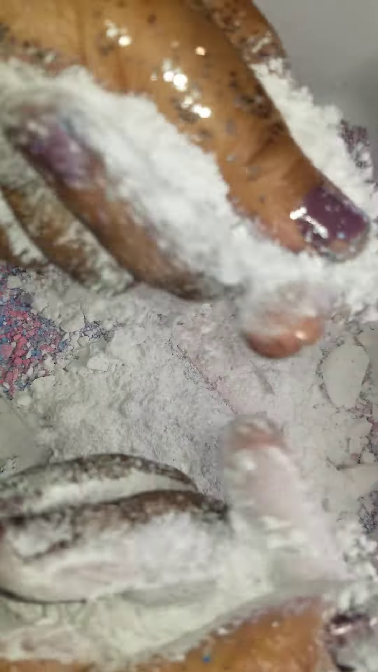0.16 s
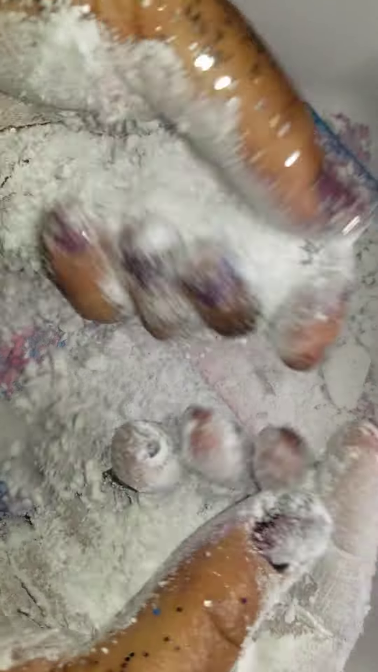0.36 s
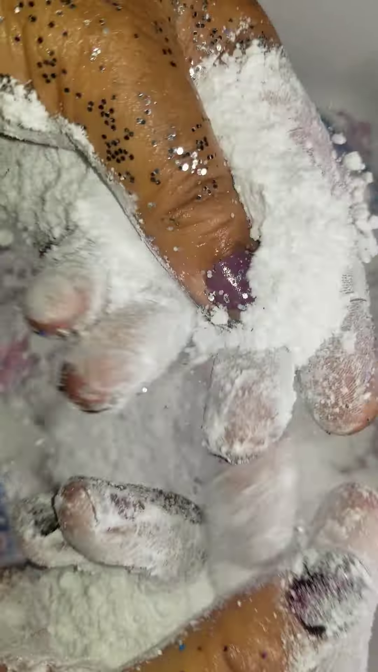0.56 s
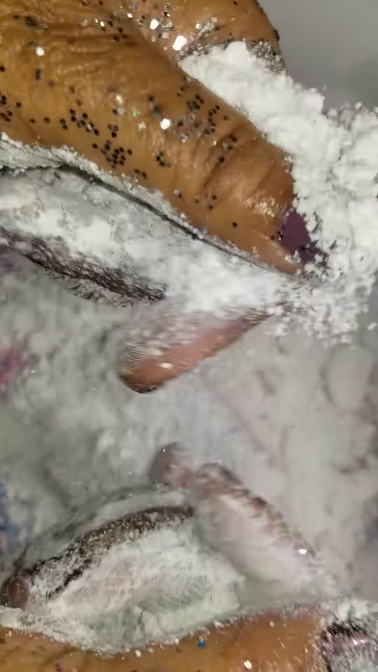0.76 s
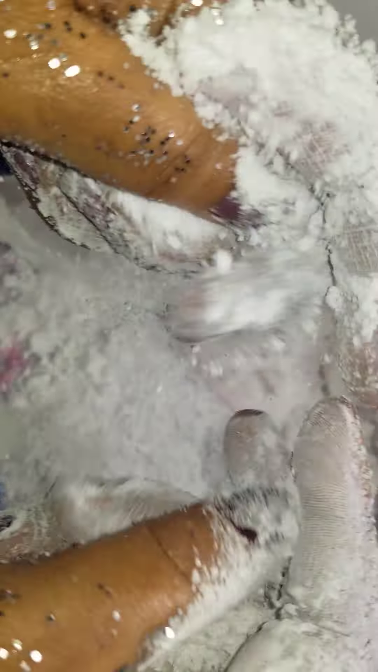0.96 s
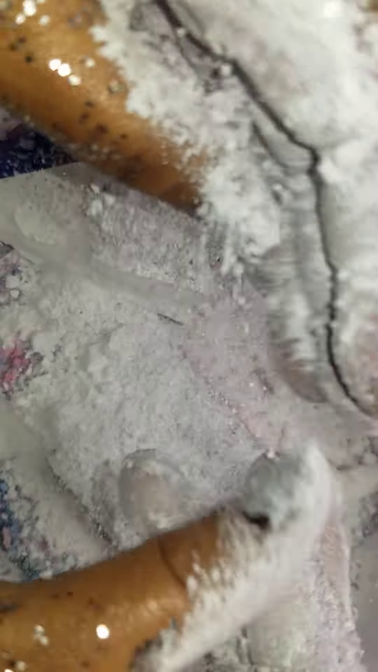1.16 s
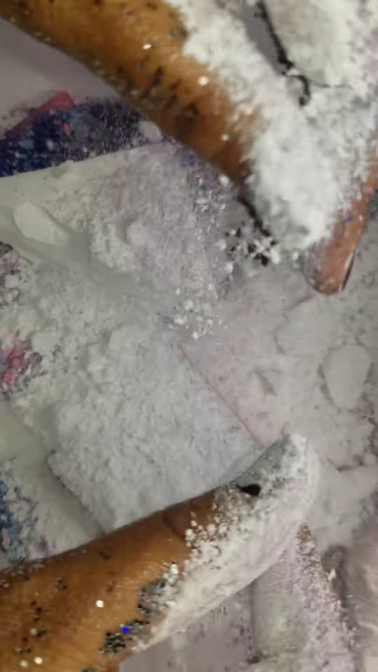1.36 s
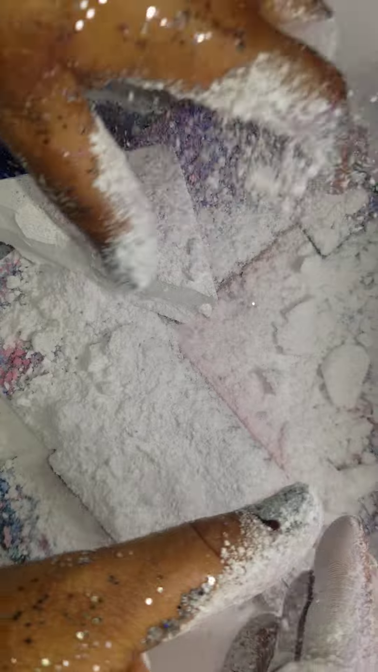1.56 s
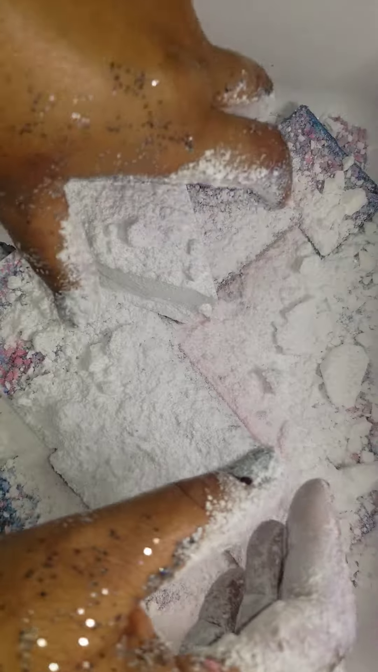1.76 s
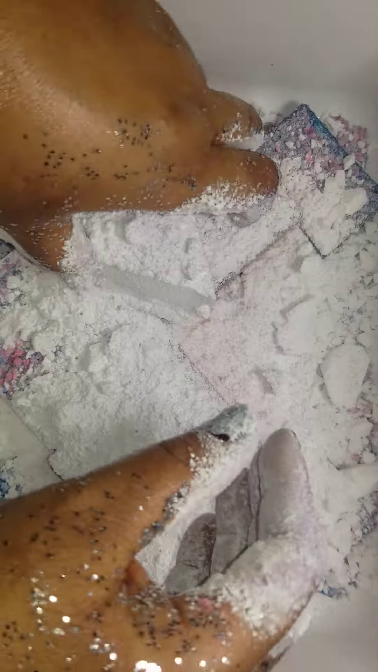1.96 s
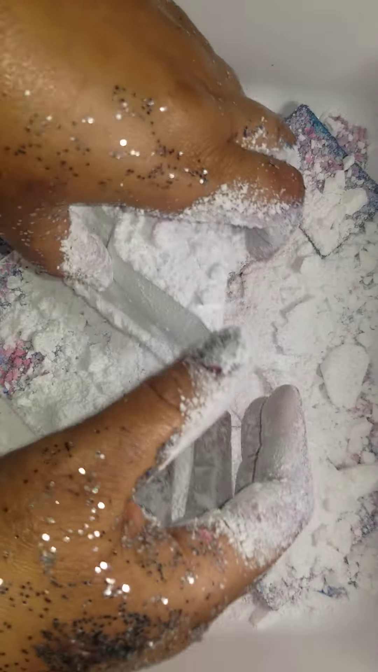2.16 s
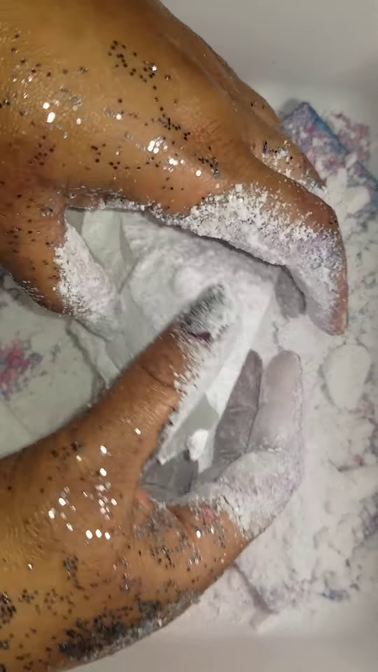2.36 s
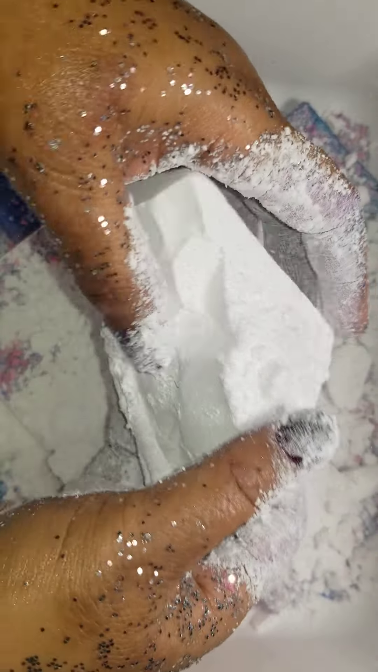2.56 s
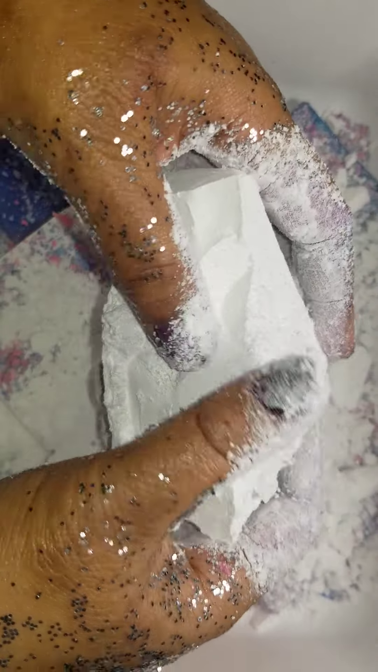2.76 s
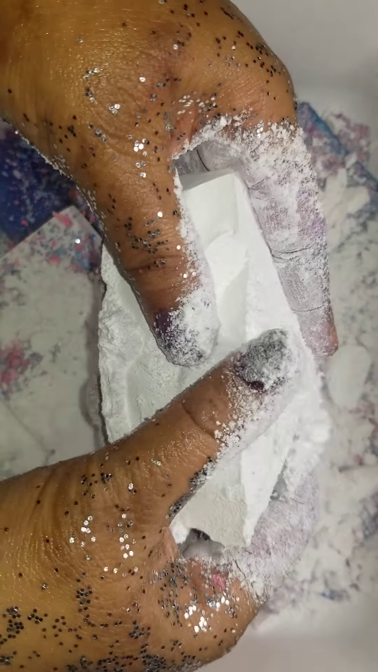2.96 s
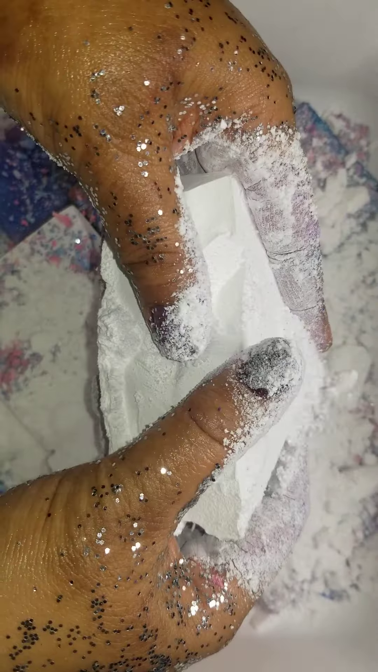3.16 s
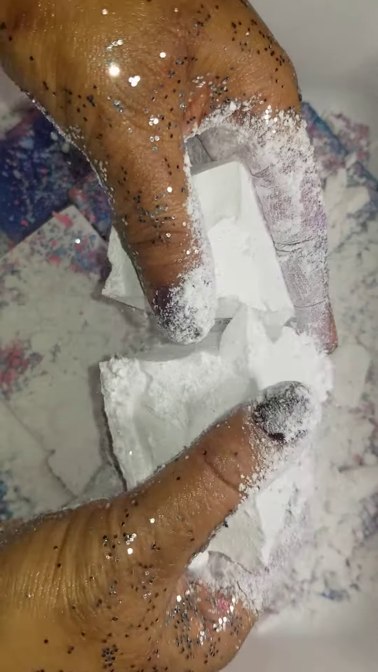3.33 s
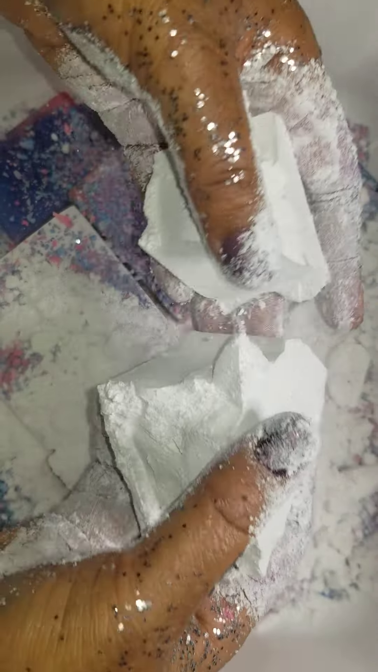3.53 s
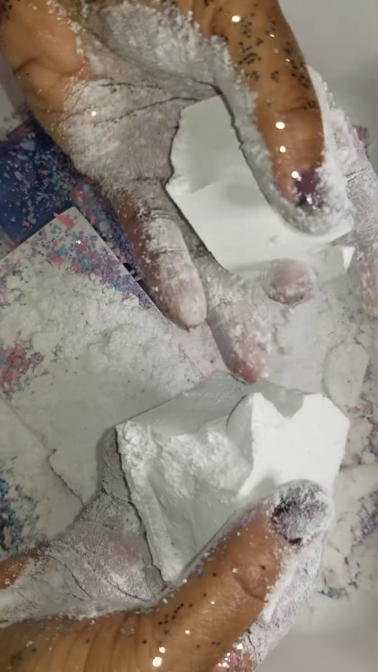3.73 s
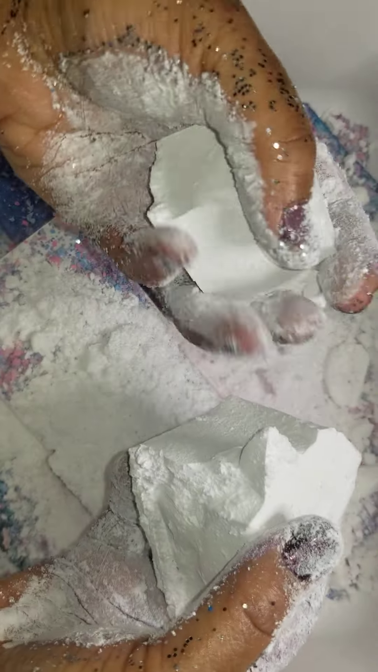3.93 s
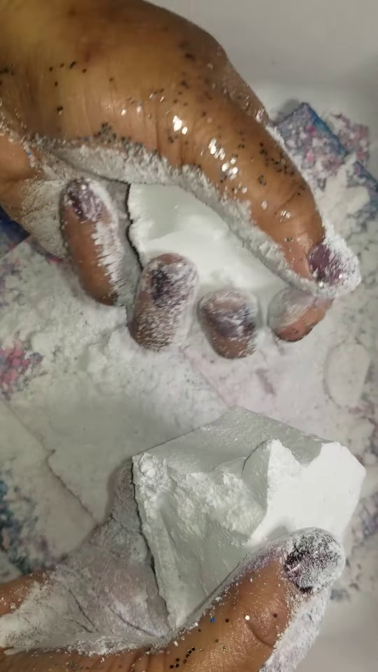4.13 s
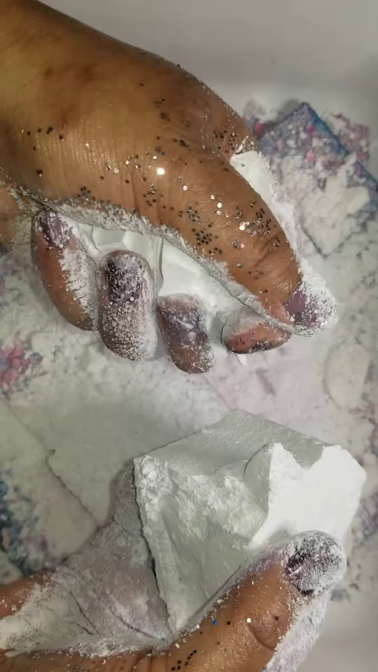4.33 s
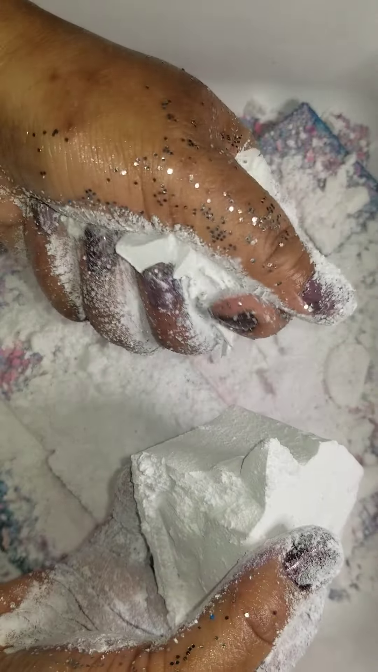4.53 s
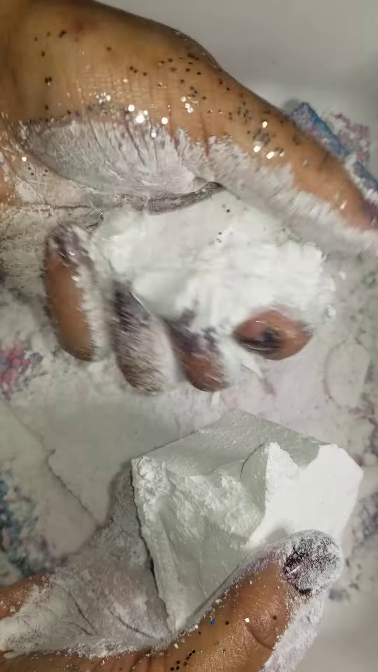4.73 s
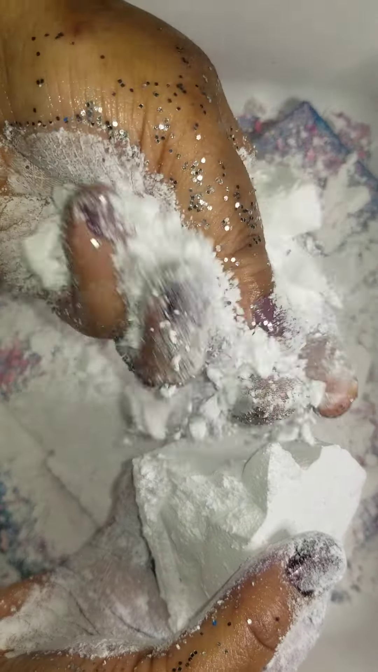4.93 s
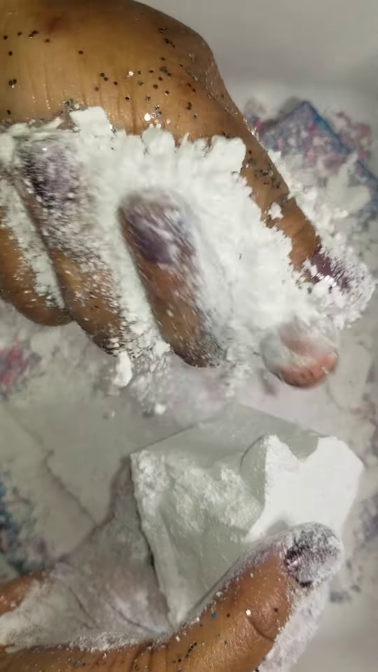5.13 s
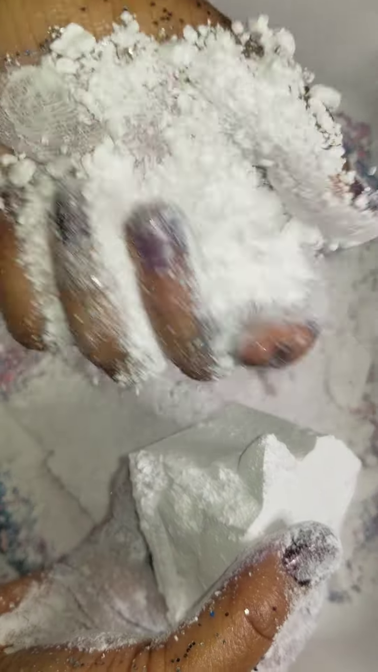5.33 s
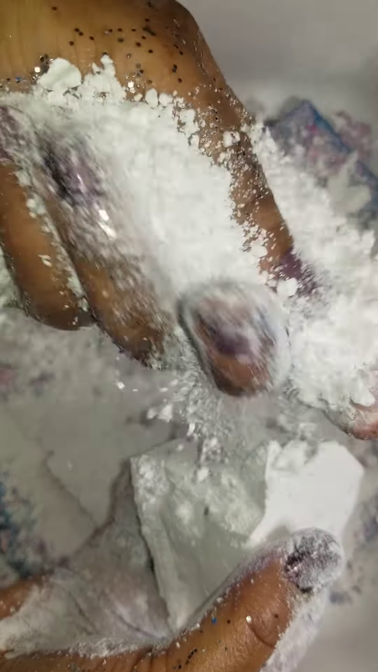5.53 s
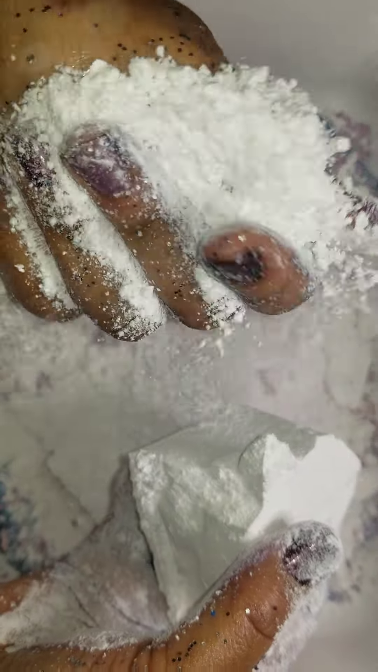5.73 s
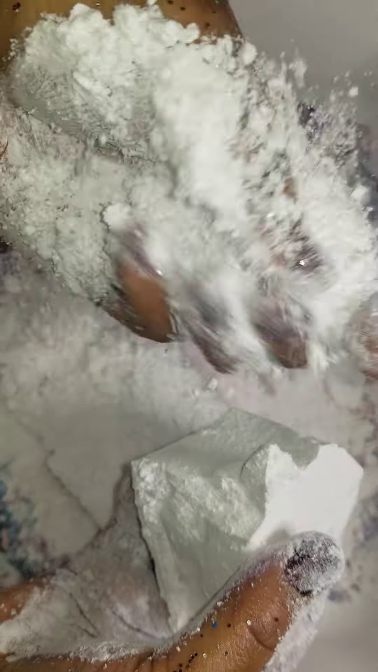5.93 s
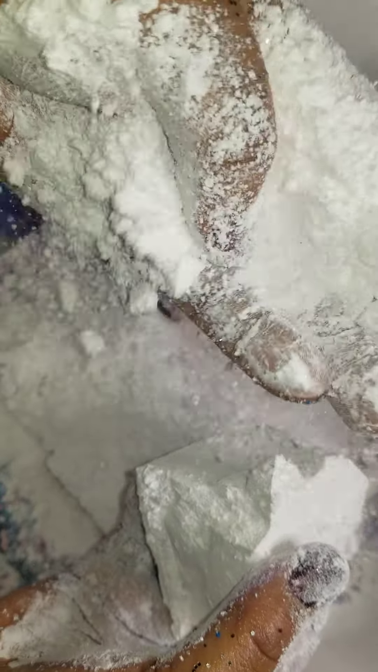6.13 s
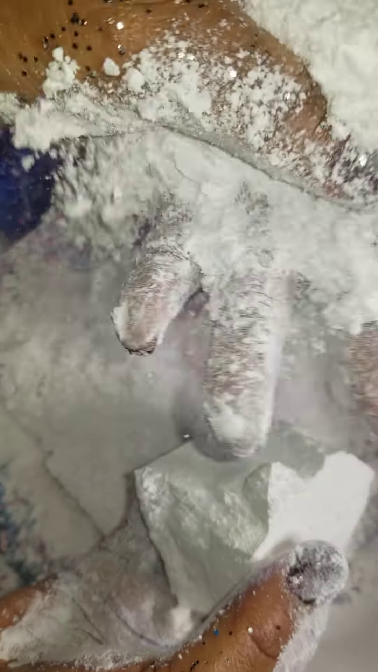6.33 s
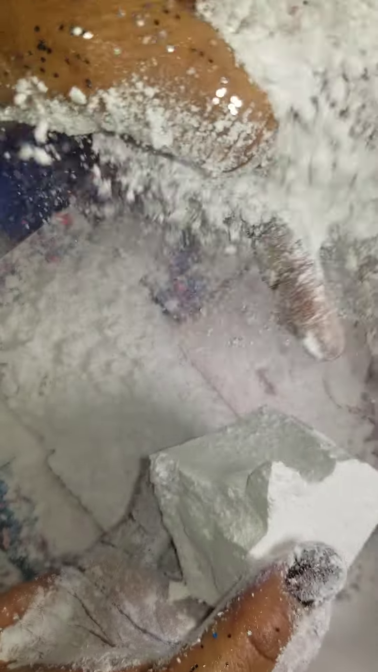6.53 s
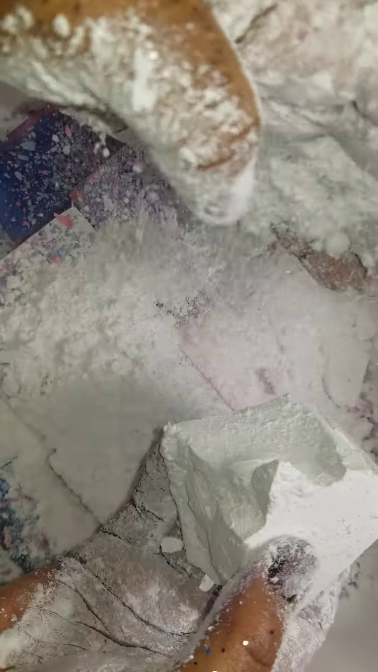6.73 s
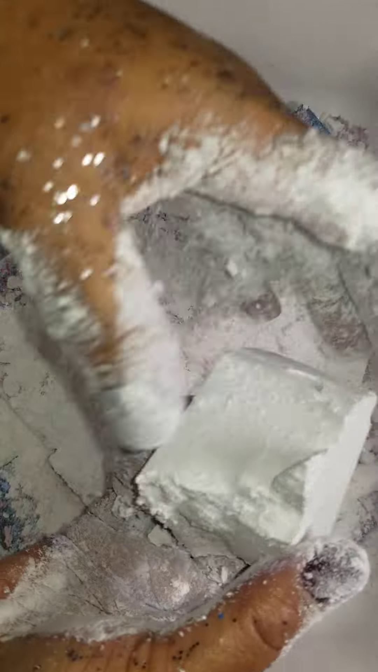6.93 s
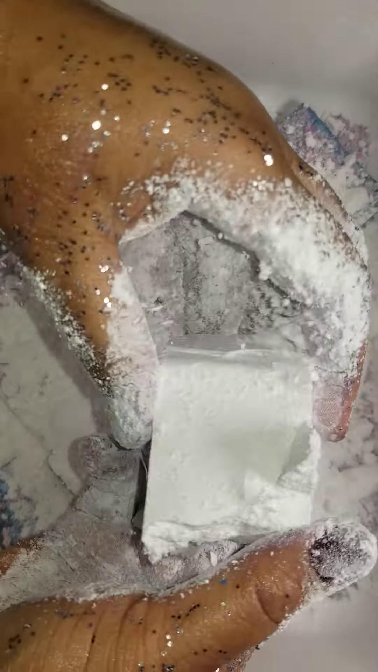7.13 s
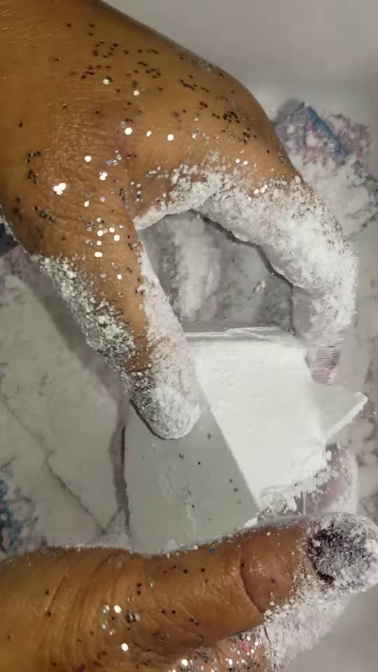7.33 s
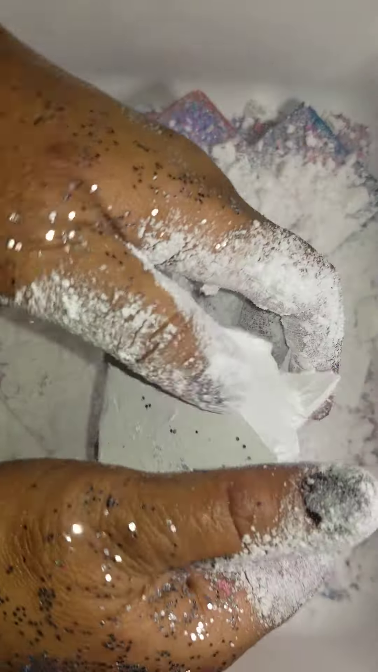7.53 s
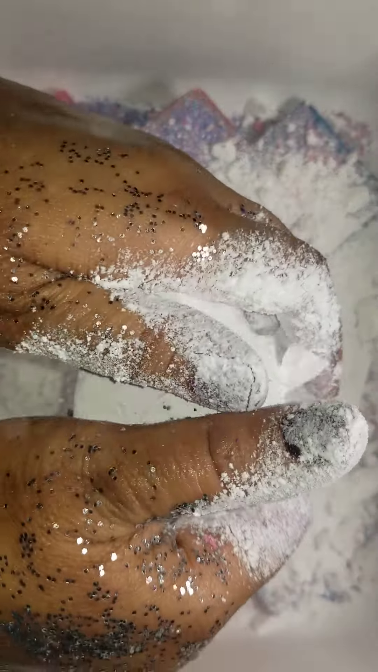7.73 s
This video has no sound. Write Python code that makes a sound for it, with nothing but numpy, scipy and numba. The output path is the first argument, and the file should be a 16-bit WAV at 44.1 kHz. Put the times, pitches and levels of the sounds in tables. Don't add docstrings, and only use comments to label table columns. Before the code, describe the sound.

A phone microphone a hand's width away catches skin hissing over fine powder, small lumps crumbling and the tub softly booming. After a near-silent pause, one crack breaks the block, a much louder snap follows about a second later, and another heavy crunch comes as the fist closes. Scattered ticks fade into finger drags and a last break, with a distant engine humming low behind.

```python
import sys
import numpy as np
from scipy import signal
from scipy.fft import rfft, irfft
from scipy.io import wavfile
from scipy.ndimage import uniform_filter1d
from numba import njit

SR = 44100
rng = np.random.default_rng(int(sys.argv[2]) if len(sys.argv) > 2 else 0)


def master_out(mix):
    frames = np.transpose(np.atleast_2d(mix))
    ceiling = np.clip(frames, -1, 1)
    pcm = np.round(ceiling * 32767).astype(np.int16)
    wavfile.write(sys.argv[1], SR, pcm)


def boost_factor(decibels):
    exponent = np.asarray(decibels, float) / 20
    return 10 ** exponent


N = 347948


def rms_one(x):
    return x / np.sqrt(np.mean(x ** 2) + 1e-20)


def peak_one(x):
    return x / (np.abs(x).max() + 1e-20)


def drift(rate):
    r = np.exp(-80 * np.pi * rate / SR)
    slow = signal.lfilter([1], [1, -2 * r, r * r], rng.standard_normal(N // 40 + 2002))[2000:]
    return np.interp(np.arange(N) / 40, np.arange(len(slow)), rms_one(slow))


def resonate(x, hz, width_hz):
    r = np.exp(-np.pi * width_hz / SR)
    gain = (1 - r * r) / 2
    return signal.lfilter([gain, 0, -gain], [1, -2 * r * np.cos(2 * np.pi * hz / SR), r * r], x)


@njit
def glide(x, angle, r):
    y = np.zeros(len(x))
    for i in range(2, len(x)):
        push = (1 - r * r) / 2 * (x[i] - x[i - 2])
        y[i] = push + 2 * r * np.cos(angle[i]) * y[i - 1] - r * r * y[i - 2]
    return y


def band(x, low_hz, high_hz):
    return signal.sosfilt(signal.butter(2, [low_hz, high_hz], "band", fs=SR, output="sos"), x)


def coloured(x, spectrum):
    hz, db = np.transpose(spectrum)
    grid = np.maximum(np.fft.rfftfreq(len(x), 1 / SR), 1)
    gain = boost_factor(np.interp(np.log(grid), np.log(hz), db))
    return rms_one(irfft(rfft(x) * gain, len(x)))


def grains(per_s, spread_db, clump_db, smooth):
    sizes = boost_factor(spread_db * np.minimum(rng.exponential(1, N), 5)) * rng.choice([-1, 1], N)
    born = rng.random(N) < per_s * boost_factor(clump_db * drift(25)) / SR
    return rms_one(sizes * born) + smooth * rng.standard_normal(N)


def hollows(modes, per_s, spread_db, smooth, shift_db):
    common = grains(per_s, spread_db, 5.0, smooth)
    total = np.zeros(N)
    for k, (hz, width_hz, db) in enumerate(modes):
        own = grains(per_s, spread_db, 2.5, smooth)
        level = boost_factor(db + shift_db * drift(3.8))
        total += (-1) ** k * level * resonate(common + 1.6 * own, hz, width_hz)
    return rms_one(total)


def chips(per_s, low_hz, high_hz, quality, smooth):
    dealt = rng.integers(0, 10, N)
    ticks = grains(per_s, 3.5, 2.5, 0) + smooth * rng.standard_normal(N)
    total = np.zeros(N)
    for k, hz in enumerate(np.geomspace(low_hz, high_hz, 10)):
        total += resonate(ticks * (dealt == k), hz, hz / quality) / np.sqrt(hz)
    return rms_one(total)


def per_sample(per_ms):
    return np.interp(np.arange(N) / SR * 1000, np.arange(len(per_ms)), per_ms)


def moves(rows, shape):
    start, length, db = np.array(rows, float)[:, :3].T[:, :, None]
    rise, fall, sag_db, lean_db = shape
    t = np.arange(0, N / SR, 1e-3) - start
    way = np.clip(2 * t / length - 1, -1, 1)
    hold = db - sag_db * way ** 2 + lean_db * way
    return hold - rise * np.maximum(-t, 0) - fall * np.maximum(t - length, 0), way


def together(rest_db, *levels_db):
    power = boost_factor(2 * rest_db) + sum(boost_factor(2 * db).sum(axis=0) for db in levels_db)
    return per_sample(10 * np.log10(power))


# (frequency [Hz], level [dB per Hz])
ROOM_SPECTRUM = [(12, -48.5), (20, -18), (60, -3), (96, -16.5), (277, -19.5), (420, -24), (1290, -31),
                 (16000, -54.5)]


def room_tone():
    air = boost_factor(-67.5 + 0.43 * drift(2.4)) * coloured(rng.standard_normal(N), ROOM_SPECTRUM)
    hum = rms_one(resonate(rng.standard_normal(N), hz=147.4, width_hz=10))
    return air + boost_factor(-74 + 1.2 * drift(1.3)) * hum


# (time [s], firing pitch [Hz], level [dB])
ENGINE = [
    (5.4, 59.7, -60),
    (5.6, 59.24, -54.5),
    (6.02, 60, -43),
    (6.22, 62.1, -47.5),
    (6.4, 60.4, -58.5),
    (6.57, 57.2, -48.5),
    (7.21, 58.15, -43.5),
    (7.61, 55, -49.5),
    (7.89, 57.3, -59.5),
]


def distant_engine():
    t = np.arange(N) / SR
    time_s, pitch_hz, level_db = np.transpose(ENGINE)
    hz, db = np.interp(t, time_s, pitch_hz), np.interp(t, time_s, level_db)
    rise = np.clip((t - 5.2) / 0.12, 0, 1)
    return rise * np.sqrt(2) * boost_factor(db + 1.2 * drift(6)) * np.sin(2 * np.pi * np.cumsum(hz) / SR)


# (delay [s], level [dB])
WALL_ECHOES = [(.0037, -18.5)]


def tub_walls(x):
    dull = band(x, 99, 5000)
    return x + sum(boost_factor(db) * np.pad(dull, (round(s * SR), 0))[:N] for s, db in WALL_ECHOES)


# (frequency [Hz], width [Hz], level [dB])
TUB_MODES = [(80, 23, 3), (148, 10, 0.5), (184, 79, -9), (318, 27, -20)]
# (start [s], length [s], level [dB])
TUB_BUMPS = [(0, 0.051, -62), (.21, 0.22, -53), (1.17, 0.14, -57.5), (1.92, 0.06, -50), (3.228, 0.021, -33),
             (3.26, 0.036, -40.5), (4.25, 0.14, -59.5), (4.86, 0.04, -42.5), (4.93, 0.18, -48.5),
             (5.12, 0.16, -34), (5.28, 0.57, -59.5), (5.73, 0.11, -50), (5.85, 0.63, -58.5),
             (6.48, 0.36, -60), (6.9, 0.064, -53.5), (7.03, 0.68, -62), (7.785, 0.041, -48),
             (7.86, 0.033, -46)]


def tub_rumble():
    bump_db, _ = moves(TUB_BUMPS, (1103, 241, 7.5, 0))
    shaken = hollows(TUB_MODES, 66.0, spread_db=-0.5, smooth=1.0, shift_db=1.5)
    return boost_factor(together(-71, bump_db)) * rms_one(band(shaken, 43, 420))


# (time [s], peak level [dB], pitch [Hz], t60 [s])
RINGING_BODIES = [(0.238, -43.5, 80, 0.14), (0.37, -48.5, 70, 0.3), (1.512, -42, 703, 0.095),
                  (1.955, -40, 82.8, 0.35), (2.441, -49.5, 69, 0.23), (3.224, -20.5, 650, 0.021),
                  (3.229, -12.5, 470, 0.017), (3.229, -19.5, 2830, 0.0073), (3.232, -27, 200, 0.041),
                  (3.229, -14, 5070, 0.012), (4.252, -12.5, 2575, 0.018), (4.2784, -5, 1724, 0.016),
                  (4.858, -35.5, 452, 0.081), (5.2168, -2, 918, 0.023), (5.217, -14.5, 473, 0.05),
                  (5.217, -17, 1450, 0.015), (5.225, -18.5, 700, 0.04), (5.172, -32, 200, 0.04),
                  (4.279, -14, 1400, .02), (4.279, -15, 2200, .01), (3.772, -48.5, 1300, .03),
                  (7.16, -39, 5000, 0.0093), (1.512, -49.5, 1310, 0.034), (1.512, -56, 2400, 0.036),
                  (.31, -36.5, 450, 0.056), (4.958, -32, 441, 0.028), (4.972, -31, 450, 0.032),
                  (7.8519, -9.5, 1660, 0.01), (7.8517, -12, 4980, 0.011), (7.853, -14.5, 295, 0.0091)]


def ringing_bodies():
    size = 16384
    out, t = np.zeros(N + size), np.arange(size) / SR
    for s, db, hz, t60 in RINGING_BODIES:
        swell = (1 - np.exp(-t * hz / 0.22)) * boost_factor(-60 * t / t60)
        wobble = rms_one(resonate(rng.standard_normal(size), hz, 0.25 * hz))
        at = round(s * SR)
        out[at:at + size] += boost_factor(db) * peak_one(swell * (0.5 * wobble - np.sin(2 * np.pi * hz * t)))
    return out[:N]


# (start [s], length [s], grit level [dB], dust re grit [dB], palm gap resonance [Hz])
SKIN_SLIDES = [(0, 0.5, -58, -3, 4540), (.2, 0.25, -53, 0.5, 4750), (0.619, 0.099, -50.5, 3.5, 7300),
               (0.781, 0.36, -53, 3.5, 4070), (1.171, 0.18, -49.5, -1.5, 4500),
               (1.305, 0.074, -51.5, 5.5, 6900), (1.662, 0.046, -74, -5, 6850),
               (1.908, 0.08, -52.5, -11, 4470), (2.19, 0.11, -70.5, -0.5, 2390),
               (2.351, 0.11, -59.5, 1, 4600), (2.423, 0.48, -69.5, 4, 4700), (3.451, .035, -52, 1, 5700),
               (3.501, 0.06, -55, -2.5, 5540), (3.569, 0.066, -66, 9.5, 5170),
               (3.684, 0.057, -47, -1, 5350), (3.804, .07, -55, -1, 6150), (3.95, 0.14, -56.5, 1, 4850),
               (4.5, 1, -65.5, -6, 6000), (5.122, 0.15, -58.5, 0, 3764), (6.48, .35, -57, -2.5, 4195),
               (6.898, 0.077, -54, -7, 4900), (7.331, 0.05, -57.5, 5, 5170), (0.487, 0.37, -59.5, -5, 5000),
               (5.916, .06, -73, 9, 4810), (7.668, 0.093, -64, -6, 4310), (2.63, 0.029, -61.5, 4, 4730),
               (2.867, 0.036, -62.5, -1.5, 5000), (4.13, .04, -68.5, 4, 5005), (7.24, .038, -55, 2, 5600),
               (3.376, 0.054, -59.5, -6, 5200), (3.716, 0.036, -52, 1, 6500), (7.035, .05, -61.5, 1, 5300),
               (7.205, .02, -54.5, 9.5, 5500), (7.388, 0.082, -66, -7, 5120), (1.102, 0.034, -56, 8, 6960),
               (.82, 0.089, -49.5, -5, 4200), (5.694, .1, -58, -9, 6400)]
# (start [s], length [s], grit level [dB], dust re grit [dB], palm gap resonance [Hz])
FINGER_DRAGS = [
    (2.669, 0.19, -54.5, -0.5, 4770),
    (4.04, 0.1, -62.5, 2, 4980),
    (7.085, 0.19, -52, -2, 7000),
    (7.5, 0.14, -50.5, -6, 5300),
]
DRAG_SINKING = [
    [-0.044],
    [.03],
    [0.17],
    [.08],
]
# (start [s], length [s], crumbs level [dB], grit re crumbs [dB])
LUMP_SQUEEZES = [(0, 0.08, -64.5, 10.5), (0.177, .26, -52.5, 0.5), (0.807, 0.24, -57.5, 10),
                 (1.233, 0.18, -66, -17), (1.537, 0.053, -68, -1.5), (3.147, 0.056, -68, 1),
                 (3.21, 0.12, -56.5, 7), (3.312, 0.064, -64.5, 7.5), (4.26, 0.02, -59, 5),
                 (4.284, 0.01, -34.5, 2.5), (4.306, 0.063, -56.5, 6), (4.36, 0.17, -60, 8),
                 (4.56, 0.33, -65.5, -11.5), (4.914, 0.099, -47.5, -6), (4.996, 0.36, -54, -3),
                 (5.183, 0.13, -45, -14), (5.278, 0.35, -60, 2), (5.504, 0.17, -58.5, 3),
                 (5.709, 0.13, -51, 2), (5.82, 0.25, -65, 8), (6.202, 0.19, -66, 9), (6.475, 0.35, -61, 10),
                 (6.898, 0.03, -62.5, 5), (7.863, 0.063, -42, 8)]


def hands():
    slide, way = moves(SKIN_SLIDES, (795.5, 207, 4.5, -1.5))
    drag, drag_way = moves(FINGER_DRAGS, (400, 600, 3.9, 0.5))
    squeeze, _ = moves(LUMP_SQUEEZES, (530, 186, 6.6, 0.46))
    crushed = squeeze + np.array(LUMP_SQUEEZES)[:, 3:]
    skin = np.vstack([slide, drag])
    rows = np.vstack([SKIN_SLIDES, FINGER_DRAGS])
    dust_db = together(-86.5, skin + rows[:, 3:4], crushed - 15.5)
    grit_db = together(-81, skin, crushed)
    crumbs_db = together(-85.5, squeeze, skin - 23)
    pitch = rows[:, 4:] * (1 - np.vstack([0 * way, np.array(DRAG_SINKING) * drag_way]))
    pressing = np.vstack([0 * way, 1 + 0.33 * drag_way])
    strongest = skin.argmax(axis=0)[None]
    gap_hz, dragging = (per_sample(np.take_along_axis(v, strongest, axis=0)[0]) for v in (pitch, pressing))
    return dust_db, grit_db, crumbs_db, gap_hz, dragging


def crumbling_bursts():
    per_s, decay_s, trickle = 120, 0.002, 0.33
    born = (rng.random(N) < per_s / SR) * np.minimum(rng.exponential(1, N), 1.6)
    return rms_one(trickle + signal.lfilter([1], [1, -np.exp(-1 / (decay_s * SR))], born + 1e-18))


GAP_LOW_MODE = 0.52
# (frequency [Hz], level [dB per Hz])
DUST_SPECTRUM = [(3240, -26.5), (5500, -4), (6670, 1), (7660, 2), (15100, -0.5), (16100, -8.5),
                 (16500, -38)]


def dust_hiss(gap_hz):
    dust = coloured(grains(9000.0, 2.3, 10.0, smooth=1.6) * boost_factor(0.7 * drift(41)), DUST_SPECTRUM)
    crossing = SR / (GAP_LOW_MODE * gap_hz)

    def echo(x):
        return 0.32 * np.interp(np.arange(N) - crossing, np.arange(N), x)

    return rms_one(dust + echo(dust + echo(dust)))


# (frequency [Hz], width [Hz], level [dB])
HAND_HOLLOWS = [(2950, 900, -30.5), (4198, 1500, 3), (5150, 570, 10.5), (6050, 2800, 2.5)]


def skin_stroke(gap_hz, dragging):
    angle = 2 * np.pi * gap_hz / SR
    r = np.exp(-np.pi * 550 / SR)
    rub = grains(2500, 3.5, 3.0, smooth=1.2)
    gap = rms_one(glide(glide(rub, angle, r), angle, r))
    low_angle = GAP_LOW_MODE * angle
    low = rms_one(glide(glide(rub, low_angle, r), low_angle, r))
    palms = band(hollows(HAND_HOLLOWS, 760.0, spread_db=3.0, smooth=0.8, shift_db=3.0), 2900, 7000)
    return rms_one(palms + 0.6 * gap + 0.18 * low) + 0.33 * dragging * low


# (frequency [Hz], width [Hz], level [dB])
LUMP_MODES = [(456.5, 33, 10.5), (950, 140, 4.5), (1510, 260, -6.5), (1800, 400, 3)]


def crumbling_lumps(bursts):
    knocks = hollows(LUMP_MODES, 300, spread_db=3.5, smooth=0.8, shift_db=1.8)
    pieces = chips(600, 400, 2200, quality=4.1, smooth=0.25)
    return (1 + bursts) / 2 * rms_one(rms_one(band(knocks, 350, 2200)) + 0.8 * pieces)


def rubbing():
    dust_db, grit_db, crumbs_db, gap_hz, dragging = hands()
    gap_hz = uniform_filter1d(gap_hz, size=600)
    bursts = crumbling_bursts()
    crunch = bursts * chips(3000, 1700, 6900, quality=4.0, smooth=0.31)
    breaking = np.clip((crumbs_db - grit_db + 20) / 12, 0, 1)
    stroke = skin_stroke(gap_hz, dragging)
    grit = np.sqrt(1 - 0.85 * breaking) * stroke + np.sqrt(0.85 * breaking) * crunch
    dust = dust_hiss(gap_hz) * (1 + 0.2 * breaking * (bursts - 1))
    hiss = boost_factor(dust_db) * dust + boost_factor(grit_db) * grit
    lag = 0.000757 * SR * (1 + 0.098 * drift(1.2))
    bounce = np.interp(np.arange(N) - lag, np.arange(N), band(hiss, 2700, 9800))
    return 0.74 * (hiss + 0.33 * bounce) + boost_factor(crumbs_db) * crumbling_lumps(bursts)


def fracture(hz, splinter_db, thud_db):
    t = np.arange(4096) / SR
    tear = rng.standard_normal((3, 4096))
    upper, lower = rng.uniform(0.88, 1.9, 2)
    t60 = 0.003 + 4 / hz
    width = 3 / t60
    front = np.minimum(t / 0.00015, 1)
    run = (tear[0] + 3 * (t < 0.00015)) * front * (boost_factor(-60 * t / 0.004) + 0.2 * boost_factor(-60 * t / 0.02))
    piece = peak_one(resonate(run, hz, width))
    piece += 0.5 * peak_one(band(run, 0.4 * hz, min(2.2 * hz, 15000)))
    overtones = resonate(run, min(upper * hz, 15000), 2 * width) - resonate(run, hz / lower, width)
    piece += 0.74 * peak_one(overtones)
    thud = band(tear[1] * front * boost_factor(-60 * t / 0.022), 170, 550)
    scatter = boost_factor(-60 * t / 0.0054) + 0.18 * boost_factor(-60 * t / 0.018)
    splinter = band(tear[2] * front * scatter, 4800, 10500)
    return peak_one(piece) + boost_factor(thud_db) * peak_one(thud) + boost_factor(splinter_db) * peak_one(splinter)


# (time [s], peak level [dB], pitch of the piece [Hz], splinters re peak [dB])
POWDER_CRACKS = [(.232, -38.5, 1980, 7), (.384, -23.5, 2800, -8), (.397, -36, 3170, -5),
                 (0.438, -23.5, 4460, -6.5), (.858, -30, 3940, -22), (.936, -36, 4400, -9),
                 (1.508, -40, 1480, -23), (.973, -22.5, 1840, -28), (1.168, -31, 5000, -2),
                 (1.185, -31, 4500, -4), (1.191, -30, 4800, -8), (1.219, -24.5, 5500, -0.5),
                 (1.233, -33, 4570, -6), (1.258, -23.5, 4570, -7), (1.275, -27, 4040, -2),
                 (1.338, -31, 4000, -15), (1.665, -41.5, 7340, -17), (1.929, -34.5, 4320, -25),
                 (2.769, -29.5, 4660, -22), (5.454, -24, 3240, 3.5), (5.51, -19.5, 4320, -20),
                 (5.552, -25.5, 3480, -14), (5.61, -13.5, 3740, -28), (5.813, -16.5, 2040, -25),
                 (5.888, -33.5, 3600, -10), (6.018, -42.5, 576, -1), (6.285, -35.5, 5020, -12),
                 (6.654, -28, 3120, -22), (6.681, -41, 3140, -22), (6.712, -22, 4230, -16),
                 (6.723, -31, 1830, -11), (.957, -35, 3800, -12), (1.206, -39, 4350, -8),
                 (3.213, -41, 2500, -5), (5.12, -40, 5000, -8), (5.154, -37, 2200, -20),
                 (5.274, -36, 4000, -15), (5.259, -32, 2500, -11.5), (5.197, -29.5, 4460, -8.5)]
# (time [s], peak level [dB], pitch of the piece [Hz], splinters
# re peak [dB])
FURTHER_SNAPS = [(0.027, -45, 4120, -13), (0.053, -31, 5050, -12), (0.112, -40, 4690, -12),
                 (0.182, -38, 1850, -12), (0.195, -38, 4380, -12), (0.211, -38, 1820, -12),
                 (0.219, -39, 1780, -12), (0.26, -42, 756, -12), (0.267, -43, 1730, -12),
                 (0.278, -43, 1810, -12), (0.29, -37, 1910, -12), (0.299, -35, 1770, -12),
                 (0.335, -30, 538, -5), (0.404, -27, 3890, -12), (0.511, -42, 4930, -10),
                 (0.719, -34, 2800, -12), (0.769, -40, 3070, -12), (0.797, -40, 6800, -12),
                 (0.868, -32, 4020, -12), (0.896, -30, 3760, -15), (0.902, -30, 1700, -12),
                 (1.005, -33, 1900, -12), (1.044, -35, 3040, -12), (1.061, -37, 3070, -12),
                 (1.092, -42, 7440, -12), (1.403, -41.5, 501, -12), (1.417, -50, 533, -15),
                 (3.248, -26, 4820, -12), (3.278, -38, 501, -10), (3.309, -40, 501, -12),
                 (3.35, -33.5, 1020, -17), (3.432, -45, 5290, -12), (3.472, -36, 5440, -12),
                 (3.499, -40, 5350, -12), (3.739, -37, 6750, -12)]
# (time [s], peak level [dB], pitch of the piece [Hz], splinters re peak [dB])
LATER_SNAPS = [(4.891, -43, 851, -12), (4.908, -36, 3260, -14), (4.987, -37, 1970, -12),
               (4.996, -39, 501, -12), (5.009, -36, 703, -14), (5.027, -40, 511, -12),
               (5.062, -38, 692, -12), (5.232, -28, 692, -16), (5.246, -29, 501, -14),
               (5.305, -30.5, 1150, -10), (5.475, -43, 2710, -12), (5.509, -25, 3110, -16),
               (5.513, -32, 3020, -14), (5.517, -35, 2710, -12), (5.583, -38, 3050, -12),
               (5.633, -45, 7310, -12), (5.639, -38, 703, -12), (5.66, -43, 3840, -15),
               (5.72, -38, 3920, -14), (5.732, -39, 942, -12), (5.767, -31, 958, -12),
               (5.842, -36, 3660, -14), (6.039, -45, 4330, -12.5), (6.303, -40, 1100, -12),
               (6.344, -39.5, 3780, -12), (6.48, -41, 2360, -12), (6.553, -33, 2940, -12),
               (6.581, -38, 3840, -15), (6.636, -31, 3170, -18), (6.767, -39, 5880, -12.5),
               (6.821, -45, 5730, -12), (6.834, -46, 5560, -13), (6.869, -46, 501, -12),
               (6.924, -37.5, 4950, -12), (6.976, -42, 5350, -12), (7.01, -52.5, 939, -12),
               (7.299, -54, 573, -12), (7.34, -42, 8770, -12), (7.565, -39, 2890, -12.5)]
# (time [s], peak level [dB], pitch of the piece [Hz], splinters re peak [dB])
BLOCK_CRACKS = [(3.139, -41.5, 2960, -27), (3.244, -19, 2770, -20), (3.343, -22, 2870, -25),
                (3.778, -36.5, 1240, -34), (3.952, -43, 4900, 17), (4.231, -28, 5030, -5),
                (4.28, 0.5, 1740, -8.5), (4.333, -26, 3320, -26.5), (4.347, -27.5, 560, -15),
                (4.353, -23.5, 2850, -8), (4.362, -30, 1660, -14), (4.373, -36.5, 3800, -9.5),
                (4.4, -32.5, 2400, -3.5), (4.414, -27, 2074, -9), (4.423, -23, 2300, -17.5),
                (4.435, -26.5, 3850, -15), (4.463, -33, 2260, -18), (4.469, -18, 5760, -24),
                (4.492, -26.5, 2000, -4), (4.648, -24, 2150, -21), (4.938, -24, 1750, -24.5),
                (4.943, -23.5, 1300, -14.5), (7.699, -26, 4650, -12), (7.878, -20, 3920, -16),
                (7.883, -36, 3880, -17)]
# (time [s], peak level [dB], pitch of the piece [Hz], splinters re peak [dB])
LUMP_CRACKS = [(0.333, -24.5, 1700, -13), (3.167, -42.5, 560, -15), (3.228, -13, 560, 1),
               (3.285, -34, 560, -29.5), (3.588, -41, 1300, -25), (4.246, -16, 2560, -2.5),
               (4.252, -15, 2610, -18.5), (4.292, -28, 1640, -22), (4.619, -33, 2260, -13),
               (4.923, -36.5, 3120, -7), (4.959, -37, 560, -21.5), (4.969, -23.5, 840, -14.5),
               (5.055, -32, 900, -4), (5.091, -30, 1120, -3), (5.137, -22, 6370, 2),
               (5.173, -25, 860, -7.5), (5.197, -32, 560, 1.5), (5.215, -24.5, 950, -21.5),
               (5.24, -16.5, 620, -37), (5.258, -33.5, 620, -19.5), (5.297, -27, 560, -22.5),
               (5.39, -35, 6350, 3.5), (5.575, -25.5, 2690, -26), (5.754, -48, 930, -19),
               (6.216, -40, 750, -13.5), (7.79, -20, 560, -4.5), (7.798, -29.5, 6460, -5),
               (7.854, -18, 1680, 2)]


def cracks():
    events = [(*row, -25.5) for rows in (POWDER_CRACKS, FURTHER_SNAPS, LATER_SNAPS) for row in rows]
    events += [(*row, -25) for row in BLOCK_CRACKS]
    events += [(*row, -10 + 10 * (4.9 < row[0] < 5.42)) for row in LUMP_CRACKS]
    out = np.zeros(N + 4096)
    for s, db, hz, splinter_db, thud_db in events:
        at = round((s - 0.0003) * SR)
        out[at:at + 4096] += boost_factor(db - 3) * fracture(hz, splinter_db, thud_db)
    return out[:N]


def scene():
    background = room_tone() + distant_engine()
    chalk = tub_rumble() + ringing_bodies() + rubbing() + tub_walls(cracks())
    return (background + chalk)[None]


def roll_off(x):
    return signal.sosfilt(signal.butter(12, 16810, fs=SR, output="sos"), x)


def record(dry):
    top = 0.95
    rounded = top * np.tanh(dry / top)
    treble_cut = signal.cheby2(12, 70, 17100, fs=SR, output="sos")
    return roll_off(signal.sosfilt(treble_cut, rounded))


dry = scene()
out = record(dry)
master_out(out)
```